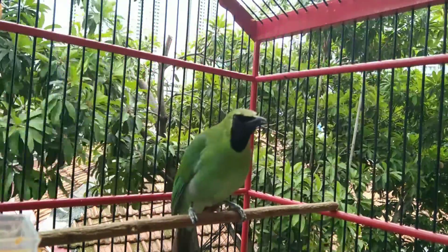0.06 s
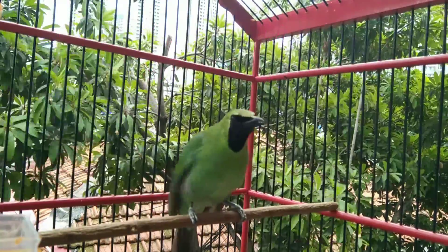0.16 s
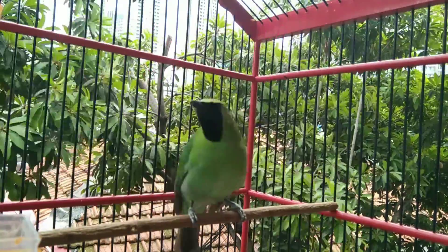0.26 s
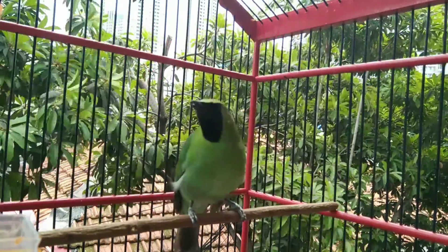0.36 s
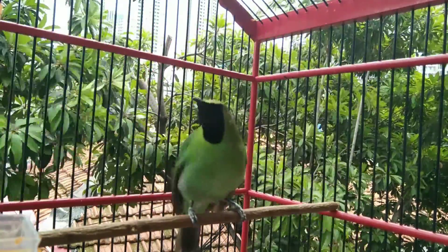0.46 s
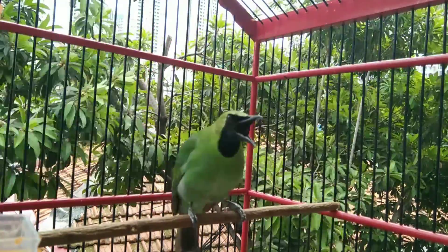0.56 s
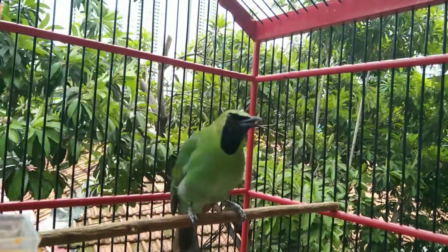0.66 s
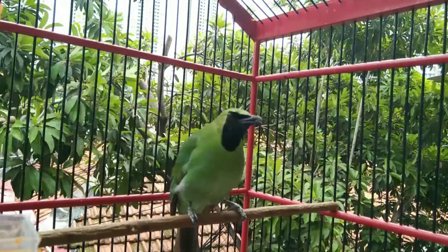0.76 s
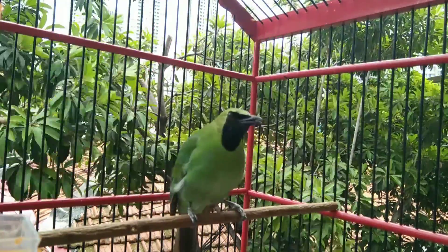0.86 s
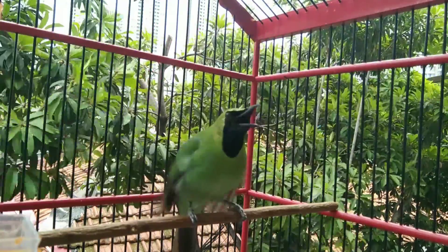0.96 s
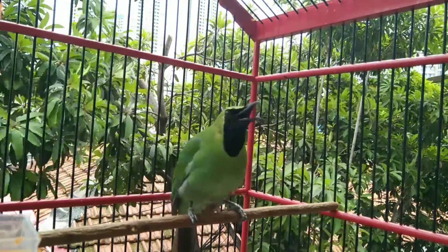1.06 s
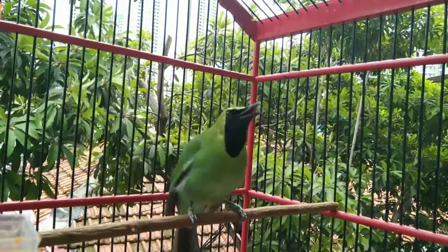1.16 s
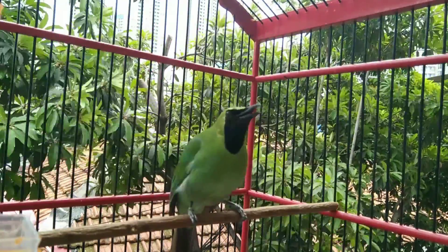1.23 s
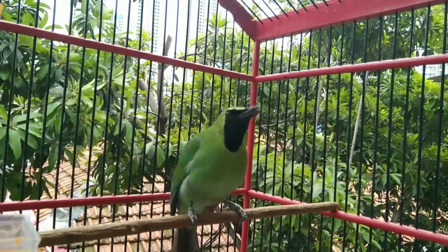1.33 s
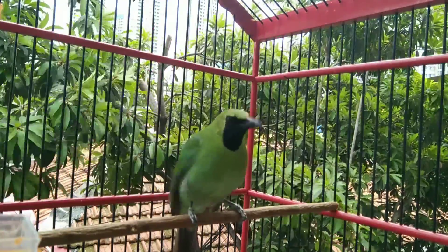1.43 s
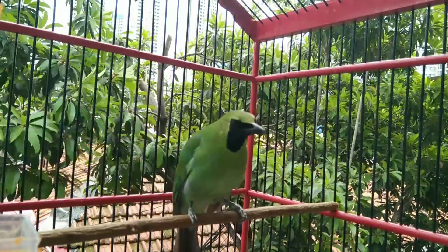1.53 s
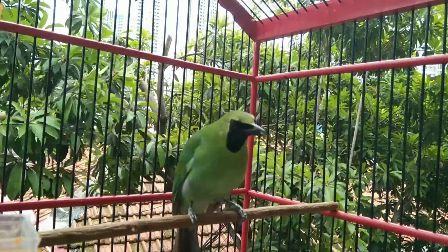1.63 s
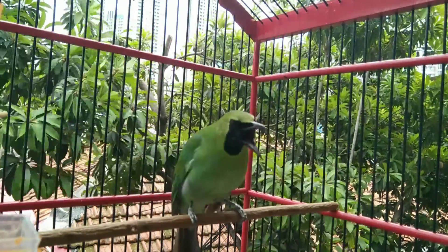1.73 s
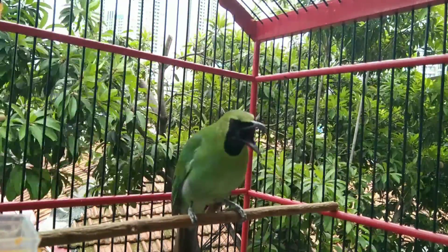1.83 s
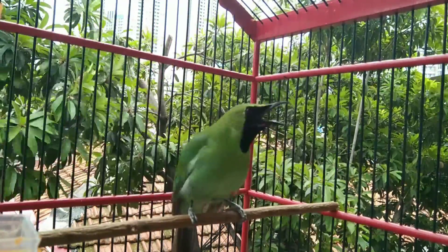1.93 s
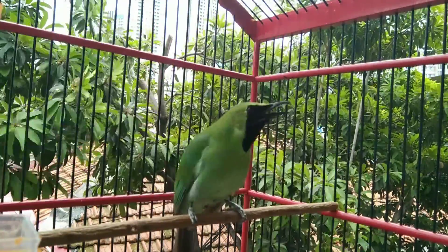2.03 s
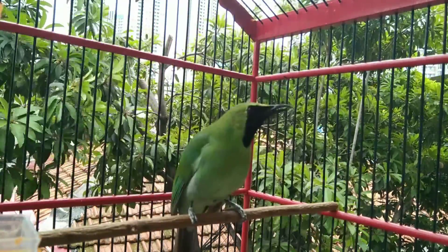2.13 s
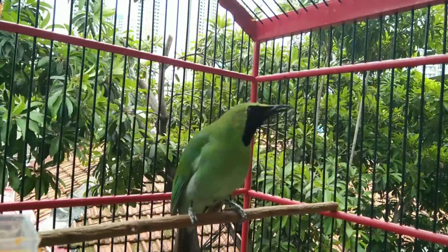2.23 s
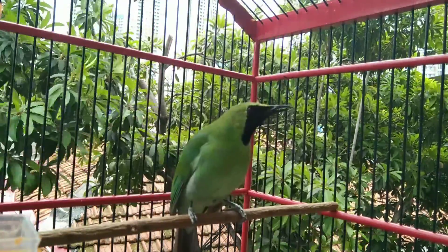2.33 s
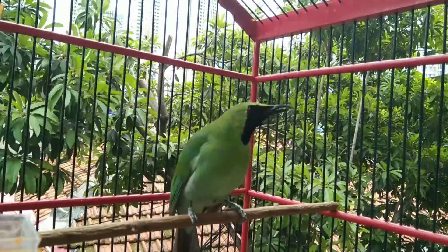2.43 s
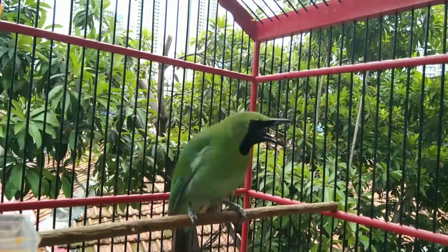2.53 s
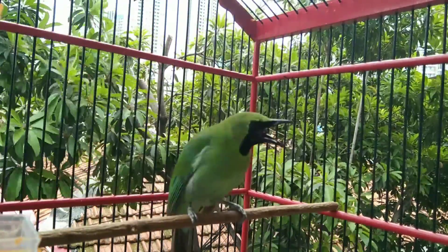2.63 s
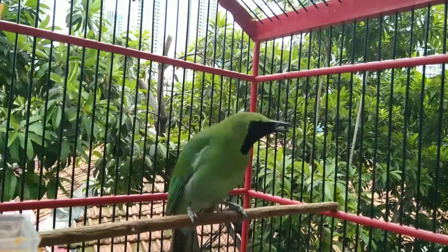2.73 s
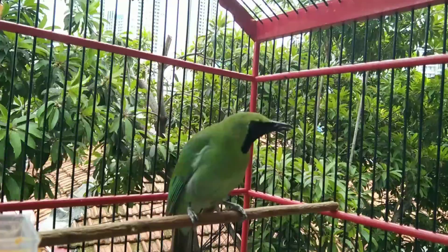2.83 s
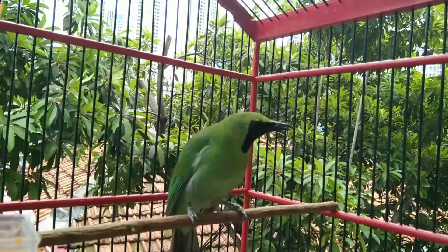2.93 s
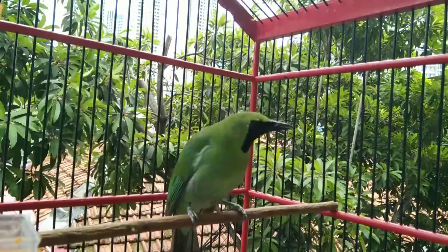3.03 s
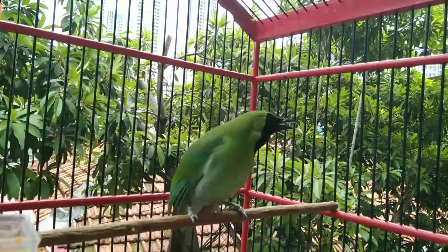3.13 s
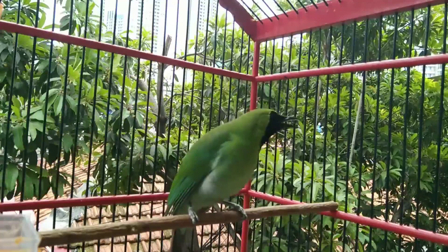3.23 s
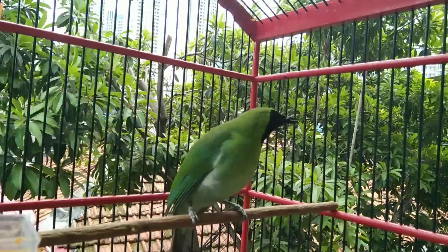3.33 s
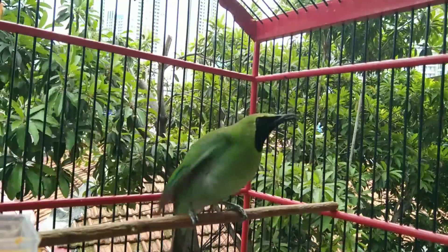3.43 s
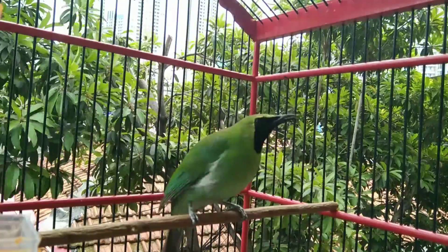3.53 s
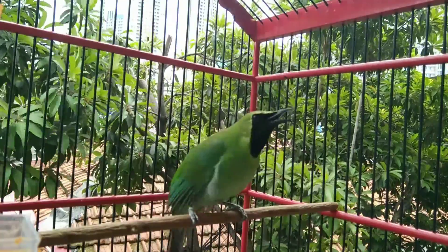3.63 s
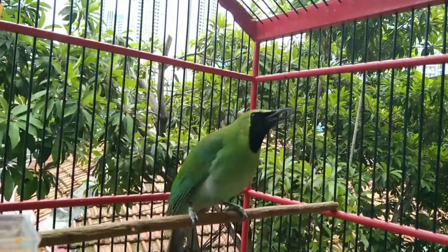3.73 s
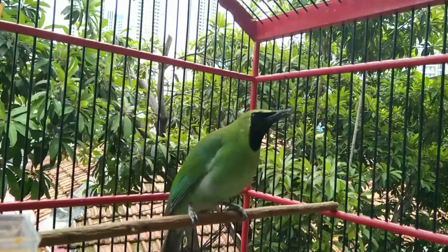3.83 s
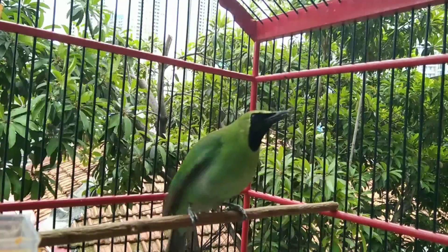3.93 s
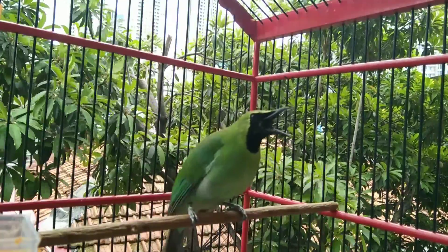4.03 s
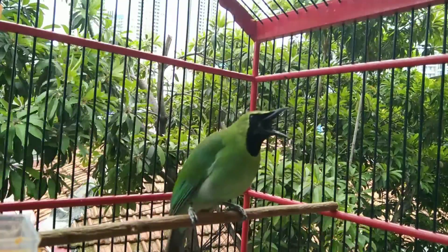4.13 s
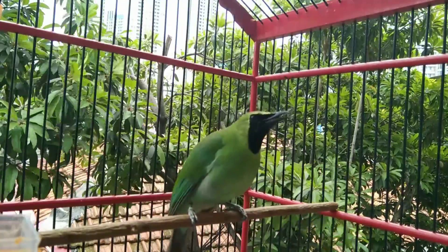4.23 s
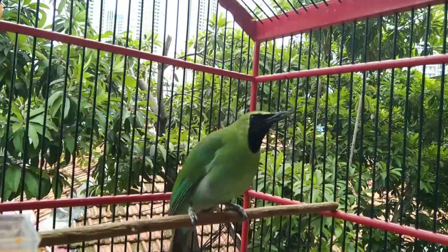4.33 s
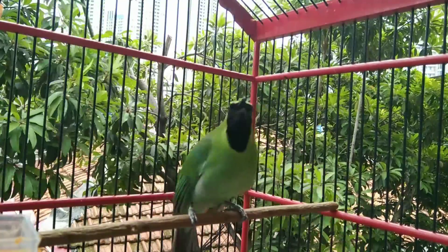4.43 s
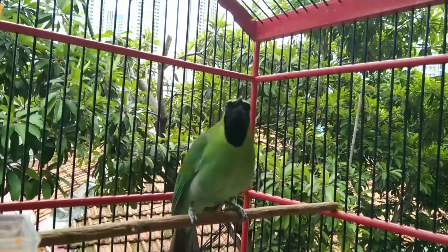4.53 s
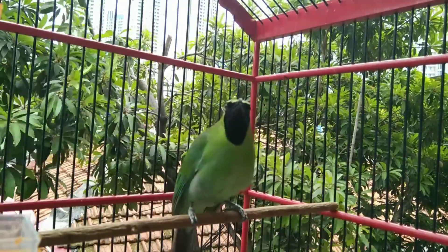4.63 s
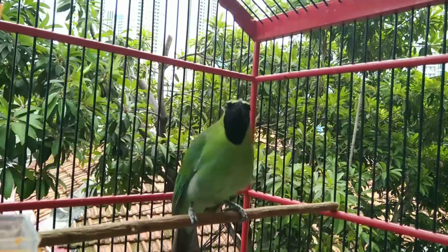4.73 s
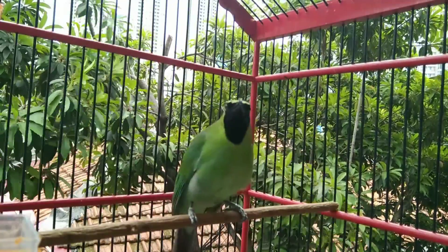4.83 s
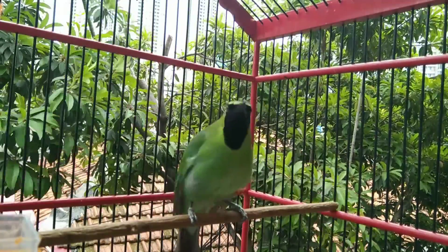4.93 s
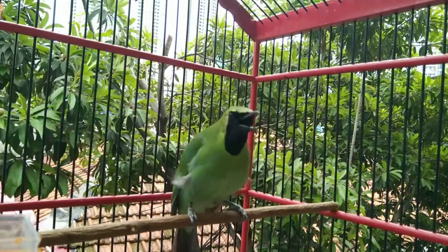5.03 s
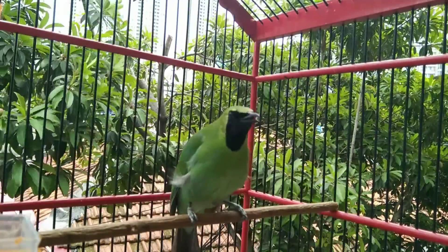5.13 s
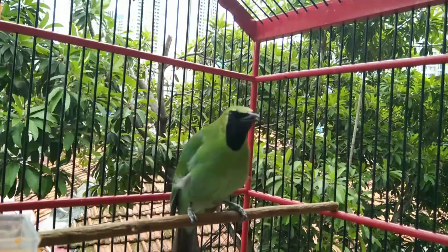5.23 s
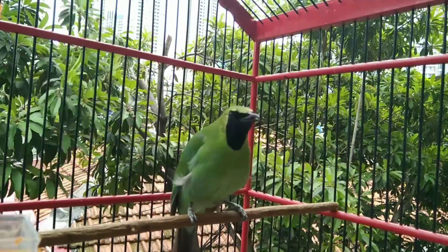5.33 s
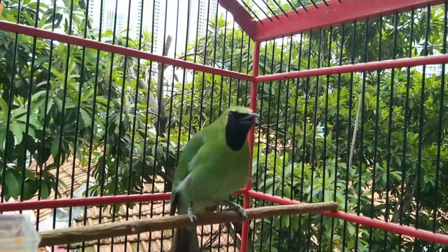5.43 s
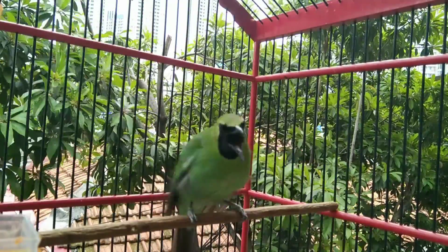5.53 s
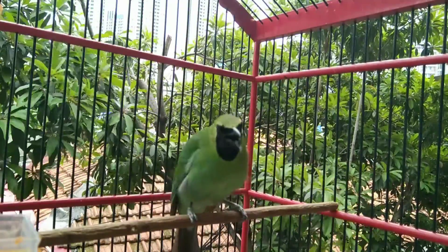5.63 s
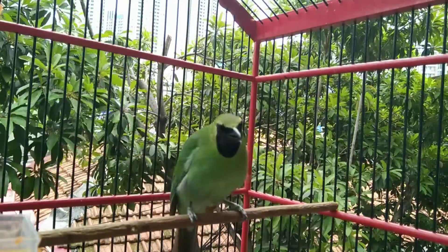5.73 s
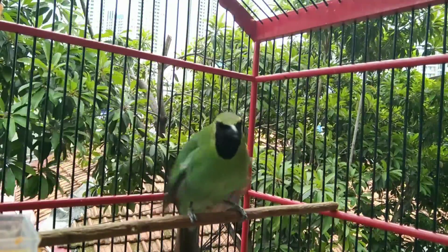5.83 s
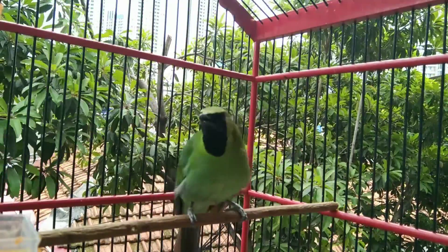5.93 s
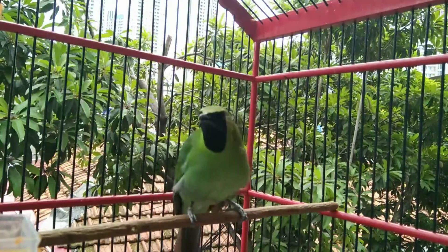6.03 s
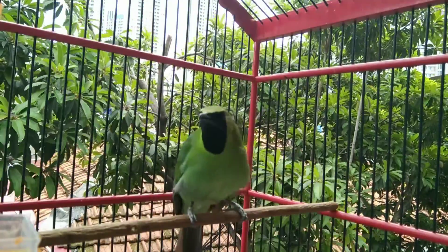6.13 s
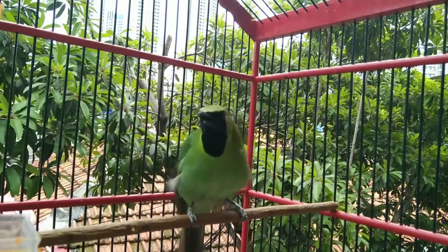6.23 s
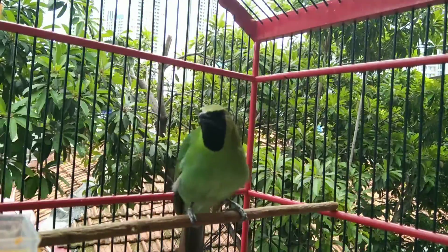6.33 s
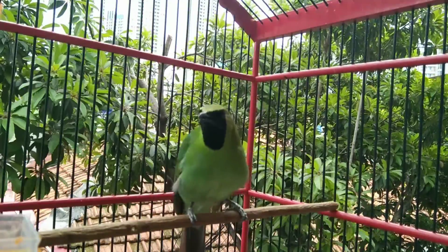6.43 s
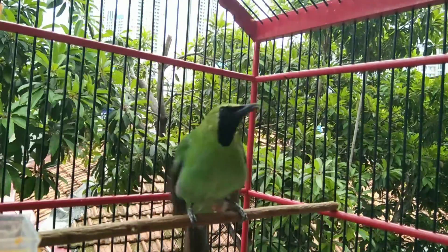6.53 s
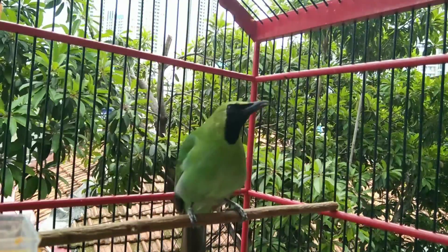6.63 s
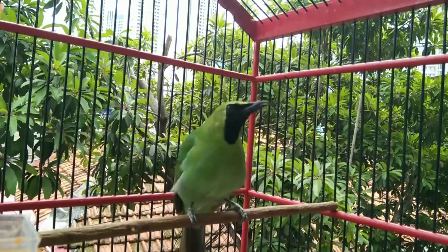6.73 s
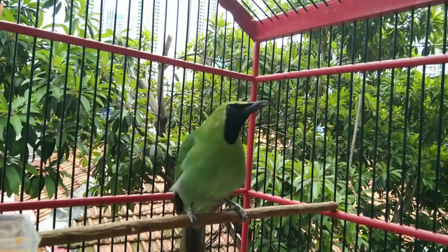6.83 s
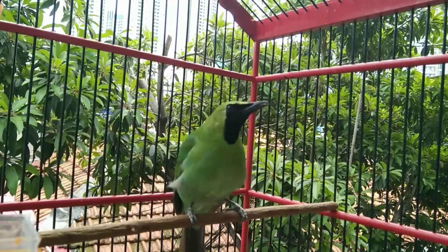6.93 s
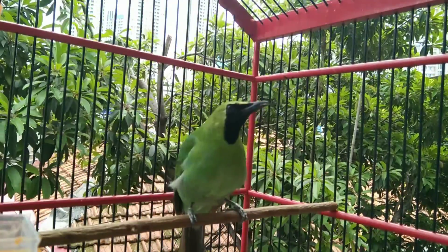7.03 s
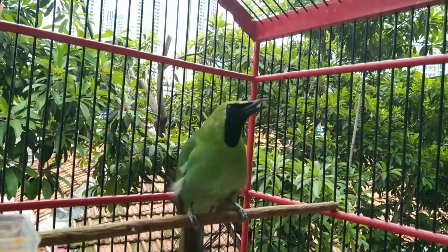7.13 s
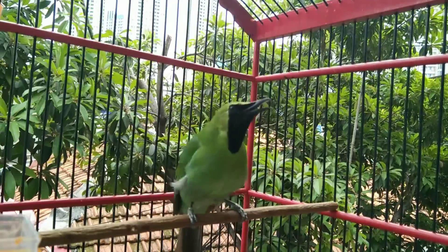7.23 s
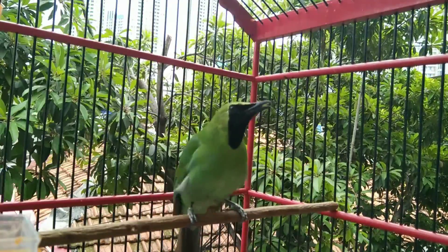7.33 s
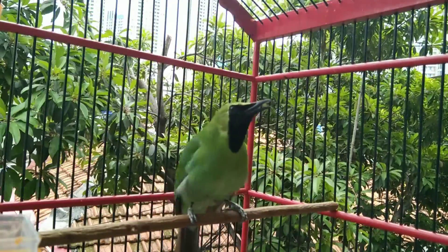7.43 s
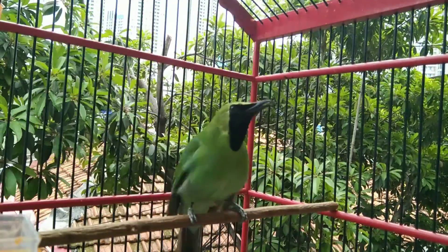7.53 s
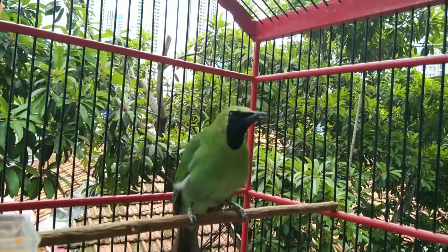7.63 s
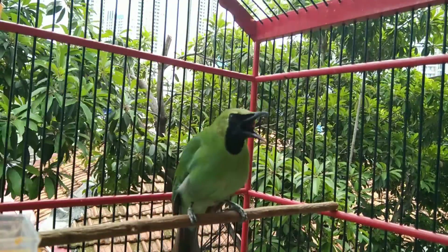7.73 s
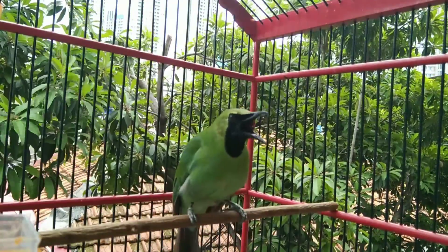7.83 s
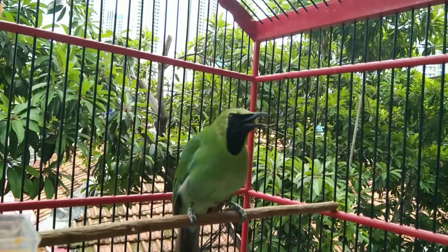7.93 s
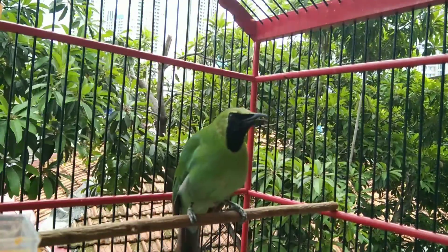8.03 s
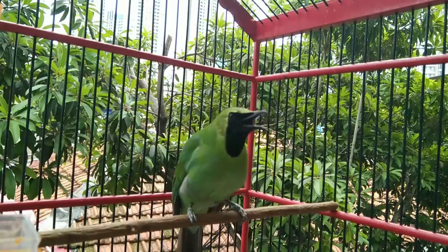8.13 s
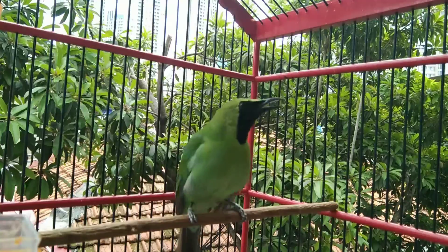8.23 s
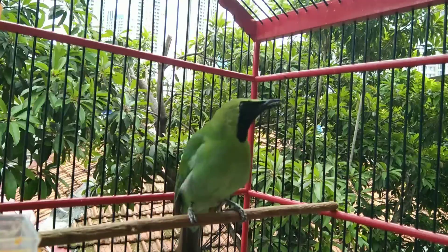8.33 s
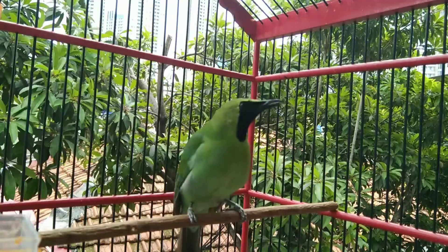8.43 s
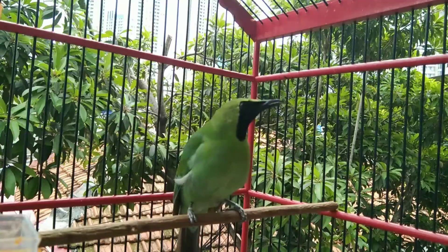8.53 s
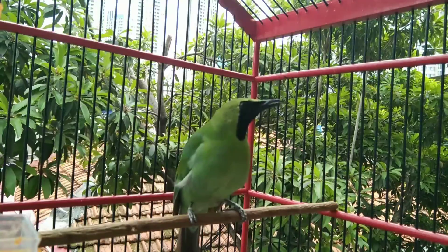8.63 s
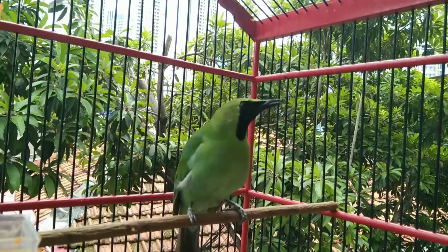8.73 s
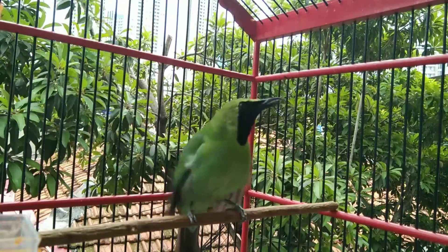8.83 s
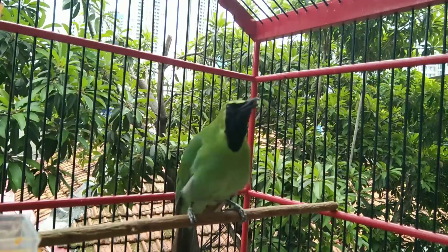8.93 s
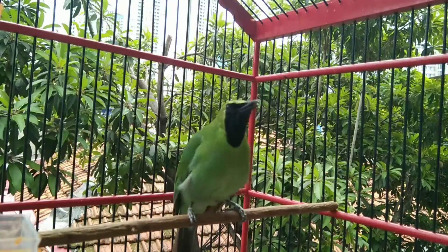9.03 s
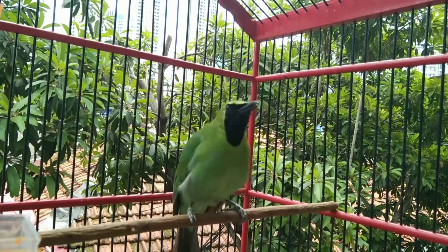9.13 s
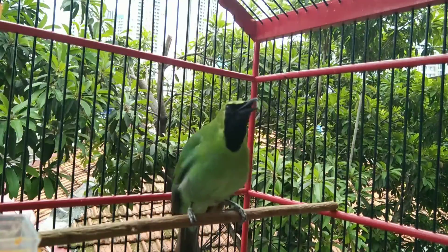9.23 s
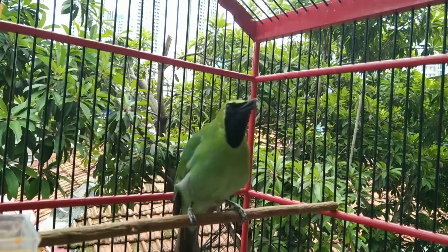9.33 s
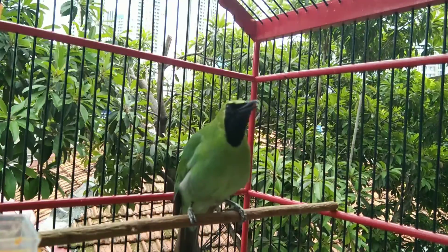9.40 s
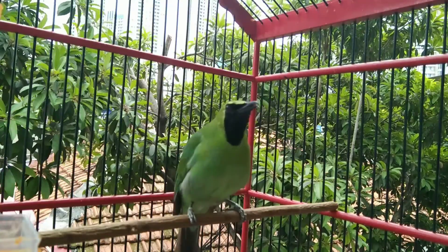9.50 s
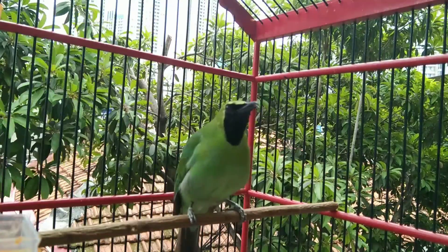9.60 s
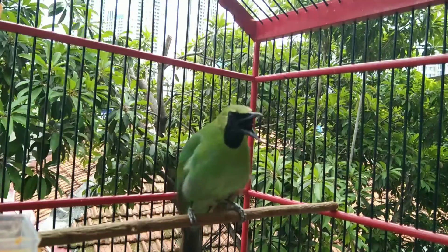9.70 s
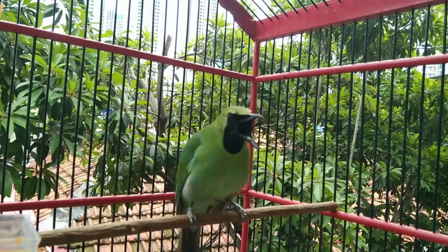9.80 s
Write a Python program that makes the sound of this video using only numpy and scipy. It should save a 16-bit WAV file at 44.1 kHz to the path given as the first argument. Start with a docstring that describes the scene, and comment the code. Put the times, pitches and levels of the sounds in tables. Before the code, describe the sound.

Outdoors on a porch beside a garden, one bird whistles brightly at close range, starting half a second in and continuing to the end with short gaps. Clean glides alternate with slightly raspy rises, then rounded up-and-down notes. The loud notes are gently levelled by a limiter. Soft bassy wind buffets the microphone, leaves rustle faintly, and a distant bird pipes weakly.

```python
"""Wind thuds on the microphone port, leaves hiss and the garden hums, as a porch still rings from a whistle.
From half a second in, a caged songbird close by clicks its beak and whistles short, nearly pure glides;
both halves of its syrinx take turns, hoarse where the membranes beat unevenly, and walls and roof answer.
Near three seconds a far bird adds thin whistles; then come dipping rises, each handed to the other voice.
Arches and falls carry on to the end; a limiter turns the level down on the loud notes throughout."""
import sys
import numpy as np
from scipy import signal
from scipy.fft import rfft, irfft, next_fast_len
from scipy.io import wavfile
from scipy.ndimage import uniform_filter1d, map_coordinates

SR = 44100
rng = np.random.default_rng(int(sys.argv[2]) if len(sys.argv) > 2 else 0)


def master_out(mix):
    """Clip the mix to full scale and print it as 16-bit PCM to the path in sys.argv[1]."""
    frames = np.transpose(np.atleast_2d(mix))
    ceiling = np.clip(frames, -1, 1)
    pcm = np.round(ceiling * 32767).astype(np.int16)
    wavfile.write(sys.argv[1], SR, pcm)


N = 434826
LEAD = 11025  # samples sung before time zero, whose echo still rings
TRACK = N + LEAD + SR  # samples in a bird's track
TOP_HZ = 15800  # nothing sounds above this


def amp(db):
    """Gain of a level in dB."""
    return 10 ** (np.asarray(db) / 20)


def unit(x):
    """x at rms 1."""
    return x / np.sqrt(np.mean(x ** 2) + 1e-20)


def along(points, hz):
    """Reads (frequency, value) points at hz, on a log frequency axis."""
    f, v = np.transpose(points)
    return np.interp(np.log(hz + 1), np.log(f + 1), v)


def wobble(rate, size):
    """A smooth random curve, rate knots a second."""
    knots = rng.standard_normal(int(size * rate / SR) + 4)
    return map_coordinates(knots, [np.arange(size) * rate / SR])


def filtered(x, gain_at):
    """x with each frequency scaled by gain_at(hz), padded so that the ends do not wrap."""
    m = next_fast_len(len(x) + 8192)
    return irfft(rfft(x, m) * gain_at(np.fft.rfftfreq(m, 1 / SR)), m)[:len(x)]


def coloured(x, points):
    """x shaped by a (frequency [Hz], gain [dB]) curve."""
    return filtered(x, lambda hz: amp(along(points, hz)))


def noise(points, size):
    """Coloured noise of rms 1."""
    return unit(coloured(rng.standard_normal(size), points))


def add(track, s, piece, rise=.004, fall=.008):
    """Lays a piece with soft ends (rise and fall in s) on a track that starts LEAD samples early."""
    t = np.arange(len(piece)) / SR
    ends = np.sin(np.pi / 2 * np.clip(np.minimum(t / rise, t[::-1] / fall), 0, 1)) ** 2
    at = track[round(s * SR) + LEAD:][:len(piece)]
    at += (piece * ends)[:len(at)]


# wind buffeting: (time [s], level [dB])
WIND = [(0, -32), (0.16, -50), (0.26, -25), (0.37, -38), (0.47, -29), (0.7, -46), (1.1, -38), (1.48, -35),
        (2.0, -47), (2.64, -45), (2.77, -23), (2.83, -37), (2.97, -27), (3.25, -33), (3.6, -38),
        (4.31, -51), (4.95, -42), (5.07, -52), (5.22, -31), (5.5, -47), (6.04, -45), (8.2, -49), (8.9, -42),
        (9.16, -30), (9.31, -50), (9.72, -39), (9.86, -55)]
# its bassy colour: (frequency [Hz], relative density [dB per Hz])
BUFFET = [(25, -21.5), (90, 1), (170, -5), (260, -16.5), (600, -35.5), (1000, -72)]


def wind():
    """Low turbulent noise thuds on the microphone port in random lumps."""
    lumps = amp(4.0 * wobble(22, size=N))
    buffet = unit(lumps * noise(BUFFET, size=N))
    return amp(np.interp(np.arange(N) / SR, *np.transpose(WIND))) * buffet


# gusts in the trees: (peak time [s], half length [s], level before flicker [dB])
LEAVES = [(0.025, 0.18, -63), (0.404, 0.15, -52), (5.509, 0.058, -48.5), (6.79, 0.053, -47.5),
          (7, 0.024, -51), (8.575, 0.033, -51.5), (9.74, 0.091, -55)]
# leaf hiss: (frequency [Hz], relative density [dB per Hz])
RUSTLE = [(1500, -38), (3000, -3.5), (5000, 0), (8000, 6.5), (10000, -6), (15000, -28)]


def leaves():
    """Each gust swells and fades as a bell curve of hiss, as many small leaves brush."""
    t = np.arange(N) / SR
    gusts = sum(amp(db) * np.exp(-((t - s) / half) ** 2) for s, half, db in LEAVES)
    flicker = amp(0.97 * wobble(27, size=N))
    return gusts * flicker * noise(RUSTLE, size=N)


# the garden's hum: (frequency [Hz], relative density [dB per Hz])
GARDEN = [(30, -22.5), (86, -3.5), (164, -9.5), (311, -12.5), (2260, -28.5), (3150, -32), (4520, -30.5),
          (5500, -35.5), (8200, -30.5), (9500, -51.5), (12000, -56), (16000, -72.5)]


def garden():
    """Steady coloured noise whose level drifts slowly."""
    return amp(-45 + 1.7 * wobble(3.33, size=N)) * noise(GARDEN, size=N)


# arched whistles: (start [s], top [s], end [s], first pitch [Hz], top pitch [Hz], last pitch [Hz],
# first level [dB], first octave [dB re level], level [dB], brightness [dB], rasp drive of the end [dB])
ARCHES = [(-0.13, -.07, -.02, 1827, 2500, 2204, -30, -20, -12, -3, -45),
          (7.21, 7.29, 7.363, 905, 2180, 1660, -46, 27, -5, 0, -25),
          (7.472, 7.533, 7.603, 1226, 2245, 1580, -37.5, 19, -4, -1, -25),
          (8.18, 8.205, 8.279, 2380, 2765, 2320, -26, -5, -3, -3, -42),
          (9.258, 9.318, 9.383, 1680, 2175, 1480, -32, -22, -7, 3, -21)]
# climb: (share of its time, share of its pitch range, level [dB re note], octave [dB re level],
# drive of the higher overtones [dB])
ARCH_UP = [(.18, .5, -23, -18, -40), (.5, .8, -5, -36, -38), (1, 1, -1, -40, -30)]
# drop: (share of its time, level [dB re note], octave [dB re level], drive of the higher overtones [dB])
ARCH_DOWN = [(.35, 0, -36, -26), (.7, -2, -24, -18), (1, -9, -20, -26)]


def arches():
    """Pitch climbs, then drops with time squared; the end turns hoarse."""
    first_upper_db = -17  # higher overtones under the octave as an arch opens
    flutter = .6  # added pitch flutter [%] of the hoarse end
    notes, hoarse = [], []
    for s, peak, end, first, top, last, first_db, octave_db, db, bright_db, rasp_db in ARCHES:
        up = [(s + u * (peak - s), first + v * (top - first), max(db + level, first_db), *tone)
              for u, v, level, *tone in ARCH_UP]
        down = [(peak + u * (end - peak), top + u * u * (last - top), db + level, *tone)
                for u, level, *tone in ARCH_DOWN]
        opening = (s, first, first_db, octave_db, octave_db + first_upper_db)
        notes.append([opening, *(np.array(up + down) + [0, 0, 0, bright_db, bright_db])])
        hoarse.append((peak + .03, end + .016, rasp_db, flutter))
    return notes, hoarse


# how long the porch rings: (frequency [Hz], time to fall 60 dB [s])
PORCH_T60 = [(1000, 0.25), (2500, 0.39), (5000, 0.31), (10000, 0.28), (16000, 0.11)]
# strength of its answer: (frequency [Hz], gain [dB])
PORCH_COLOUR = [(1500, -2), (2300, -2), (2900, 0.5), (3600, -2), (10000, 1)]


def porch(x):
    """The answer builds up as the far walls join in; each frequency dies at its own speed."""
    build = 0.008  # s
    hz, t, z = signal.stft(rng.standard_normal(SR), SR, nperseg=256)
    decay = amp(-60 * t / along(PORCH_T60, hz)[:, None])
    shape = (1 - np.exp(-(t / build) ** 2)) * decay
    tail = signal.istft(z * shape, SR, nperseg=256)[1]
    return signal.fftconvolve(coloured(x, PORCH_COLOUR), tail / np.linalg.norm(tail))[:len(x)]


# the beak ticks open: (time [s], drive before colouring [dB])
TICKS = [(0.5328, -20.5), (1.0049, -18), (1.7642, -12.5), (2.571, -9), (2.8843, -25), (3.1575, -15),
         (3.6445, -14), (4.0492, -14), (4.4273, -24), (4.9675, -20), (5.8644, -24), (7.201, -19),
         (7.2075, -13), (7.4641, -14.5), (8.166, -22), (8.8822, -16), (9.248, -15), (9.7514, -15)]
# (frequency [Hz], gain [dB])
TICK_COLOUR = [(300, -20), (1200, -7), (2500, -5), (4200, -15), (7000, -30), (15000, -42)]


def beak_ticks():
    """Each opening of the beak is a noise burst that falls 60 dB in 30 ms, cut short by a soft end."""
    taps, t = np.zeros(TRACK), np.arange(1200) / SR
    for s, db in TICKS:
        add(taps, s, amp(db - 60 * t / .03) * rng.standard_normal(len(t)), rise=.0006)
    return coloured(taps, TICK_COLOUR)


# high falling whistles: (start [s], length [s], first pitch [Hz], last pitch [Hz], bend of the fall,
# first level [dB], level [dB], brightness [dB])
FALLS = [(0.553, .182, 5330, 4450, 1.45, -18, -5, -1), (4.071, .16, 5780, 4600, 2.9, -16, -2, 0),
         (5.533, .17, 5600, 4450, 1.45, -30, -4, 0), (9.768, .19, 5530, 4500, 1.3, -20, -3, 4)]
# their course: (share of length, level [dB re note], octave [dB re level], drive of the higher overtones [dB])
FALL_SHAPE = [(0, 0, -12, -40), (.13, 0, -25, -38), (.3, -1, -23, -31), (.55, 0, -22, -32),
              (.78, -2, -21, -35), (1, -5, -24, -37)]


def falls():
    """Pitch drops along a power curve, quick at first and then settling."""
    u, level, octave, upper = np.transpose(FALL_SHAPE)
    notes = []
    for s, length, first, last, bend, first_db, db, bright_db in FALLS:
        hz = last + (first - last) * abs(1 - u) ** bend
        note_db = np.where(u > 0, db + level, first_db)
        notes.append(np.c_[s + u * length, hz, note_db, octave + bright_db, upper + bright_db])
    return notes


# calls sung once, one list for each voice: (time [s], pitch [Hz], level [dB], octave [dB re level],
# drive of the higher overtones [dB])
CALLS_ONCE = [
    [(1.008, 2124, -54.5, 10.5, -8.5), (1.02, 2900, -24, -11, -20.5), (1.045, 3230, -13.5, -11.5, -31.5),
     (1.07, 2970, -10.5, -30, -39.5), (1.13, 2773, -8.5, -23, -31), (1.2, 2426, -9, -39.5, -26.5),
     (1.25, 2300, -9, -36, -31), (1.303, 2330, -9.5, -35.5, -27)],
    [(1.047, 3576, -20.5, -1, -23), (1.07, 3347, -7.5, -27, -30), (1.103, 3150, -35, -11.5, -30.5)],
    [(1.772, 1240, -40.5, 10, 6), (1.785, 1943, -28, 8, 7.5), (1.81, 2366, -25, 18, 0),
     (1.835, 2614, -18.5, 3.5, -7.5), (1.87, 2739, -13.5, -4, -14.5), (1.93, 2635, -16, -4.5, -7),
     (2.0, 2701, -10, -16, -35), (2.06, 2554, -6.5, -26, -45), (2.085, 2370, -3, -35, -36),
     (2.158, 2293, -10, -32, -25)],
    [(1.825, 4860, -20.5, -16.5, -25), (1.845, 4676, -11.5, -22, -31), (1.88, 4900, -14, -29, -41),
     (1.938, 4750, -16, -22.5, -29.5)],
    [(2.575, 1320, -33, 7, -2.5), (2.59, 3240, -22, -2, -36), (2.61, 4020, -11, -5.5, -25.5),
     (2.635, 4800, -9, -20.5, -33.5), (2.69, 5160, -8, -12.5, -27), (2.78, 4907, -10.5, -14, -38.5),
     (2.797, 4655, -6, -23, -49), (2.809, 3490, -25, -22, -29.5)],
    [(2.578, 751, -46, -20, 14), (2.59, 1600, -32, -30, 1.5), (2.61, 2093, -23, -29, -12.5),
     (2.68, 2400, -33, -28, -11.5), (2.73, 2445, -64, -26, -3)],
    [(3.275, 3440, -15, -31, -30), (3.286, 3306, -45.5, -30, -34)],
    [(4.55, 3580, -21.5, -26.5, -27), (4.563, 3380, -32, -39.5, -32)],
    [(7.787, 2444, -33.5, -23.5, -8.5), (7.797, 3830, -25, -6.5, -42.5), (7.82, 4680, -1, -26, -49),
     (7.84, 4850, -6.5, -17.5, -21), (7.865, 4500, -5.5, -17.5, -21), (7.895, 3880, -8, -6.5, -33.5),
     (7.94, 3677, -6.5, -22, -39), (7.99, 3246, -9, -19.5, -45)],
    [(8.885, 963, -45, 18, -2), (8.9, 1590, -26.5, -15, -43), (8.92, 1692, -20, -23, -37.5),
     (8.937, 2075, -6.5, -32, -36.5), (8.952, 1940, 1.5, -31.5, -29), (8.963, 2020, -3.5, -27, -21),
     (9.01, 1866, -7.5, -29, -16), (9.053, 1532, -16.5, -25, -40.5)],
]


def single_calls():
    """Freely drawn glides, some of them two voices at once."""
    return list(CALLS_ONCE)


# stretches where the membranes beat unevenly: (start [s], end [s], rasp drive [dB], added pitch flutter [%])
RASP = [(1.01, 1.064, -20.5, 1.), (1.784, 1.941, -17, 0.37), (2.06, 2.095, -33, .8),
        (2.57, 2.69, -23, 0.42), (8.897, 8.932, -30, 0.9), (9.024, 9.073, -22, 0.77)]


def hoarseness(stretches):
    """Rasp gain and pitch flutter over time, as uneven membranes come and go."""
    rasp, flutter = np.zeros((2, TRACK))
    for start, end, db, percent in stretches:
        stretch = np.ones(round((end - start) * SR))
        add(rasp, start, amp(db) * stretch, rise=0.02, fall=0.01)
        add(flutter, start, percent / 100 * stretch, rise=0.0053, fall=.015)
    return rasp, flutter + 0.0039  # a little flutter is always there


# the far bird: (start [s], length [s], first, middle and last pitch [Hz], peak level before wobble [dB])
FAR = [(2.915, .05, 2850, 2540, 2830, -60), (2.99, .098, 3230, 3280, 3100, -57),
       (3.1, .05, 3750, 3750, 3300, -62), (5.17, .24, 3850, 3970, 4165, -65),
       (6.45, .07, 4770, 4650, 4570, -69), (6.56, .12, 4650, 4600, 4560, -70)]


def far_bird():
    """Thin pure whistles from across the garden, their level wavering."""
    out = np.zeros(TRACK)
    for s, length, first, middle, last, db in FAR:
        path = [(s, first), (s + length / 2, middle), (s + length, last)]
        phase, hz = glide(path, np.full(SR, .004))
        add(out, s, amp(db + 5.2 * wobble(42, size=len(hz))) * np.sin(phase))
    return out


# dipping rises: (start [s], dip [s], break [s], dip, kick, sag, mid-climb and top pitch [Hz],
# kick level [dB], level [dB], brightness [dB], rasp drive [dB])
RISES = [(3.165, 3.192, 3.252, 1630, 1960, 2020, 2370, 2400, -16, -4, -6, -38),
         (3.652, 3.67, 3.738, 1650, 1880, 1780, 2280, 2600, -19, -5, -2, -30),
         (4.436, 4.455, 4.525, 1620, 1780, 1620, 2210, 2360, -23, -6, -1, -28),
         (4.971, 4.999, 5.059, 1630, 1820, 1770, 2240, 2600, -18, -3, 2, -27),
         (5.871, 5.895, 5.968, 1650, 1720, 1760, 2200, 2310, -25, -7, 2, -27),
         (6.196, 6.22, 6.283, 1410, 1450, 1620, 2240, 2310, -20, -3, -2, -29)]
# start, dip, kick, sag, then three climb points:
# (level [dB re kick, then re note], octave [dB re level], drive of the higher overtones [dB])
RISE_TONE = [(-14, -24, -36), (-4, -14, -24), (0, -21, -24), (-1, -22, -22), (-6, -33, -27), (0, -36, -27),
             (-4, -14, -15)]
# (share of climb time and share of the way to mid-climb pitch at its first point, share of time at mid-climb)
CLIMB = (.22, .55, .55)


def rises():
    """Pitch dips, kicks and sags, then climbs until the voice breaks; hoarse from the dip on."""
    from_hz, kick_s, sag_s = 1910, .007, .014  # opening pitch; kick and sag after the dip
    dip_flutter, climb_flutter = 1.8, .6  # added pitch flutter [%]
    early, share, middle = CLIMB
    notes, hoarse = [], []
    for s, dip, end, low, kick, sag, mid, top, kick_db, db, bright_db, rasp_db in RISES:
        foot = dip + sag_s
        path = [(s, from_hz, kick_db), (dip, low, kick_db), (dip + kick_s, kick, kick_db), (foot, sag, kick_db)]
        climb = [(early, sag + share * (mid - sag)), (middle, mid), (1, top)]
        path += [(foot + u * (end - foot), hz, db) for u, hz in climb]
        notes.append([(t, hz, base + level, *np.add(tone, bright_db))
                      for (t, hz, base), (level, *tone) in zip(path, RISE_TONE)])
        hoarse += [(dip - .012, foot + .012, rasp_db, dip_flutter), (foot, end + .005, rasp_db, climb_flutter)]
    return notes, hoarse


# held notes: (start [s], length [s], first pitch [Hz], last pitch [Hz], level [dB], last level [dB],
# brightness [dB])
HOLDS = [(3.245, .085, 2850, 2830, -5, -15, -6), (3.733, .05, 2910, 2890, -8, -11, -1),
         (4.52, .065, 2810, 2770, -7, -17, -2), (5.055, .09, 2885, 2850, -5, -16, 1),
         (5.967, .046, 2740, 2290, -9, -13, 1), (6.282, .051, 2760, 2160, -5, -10, -1)]
# entry to end: (octave [dB re level], drive of the higher overtones [dB])
HOLD_TONE = [(-22, -20), (-36, -25), (-33, -30), (-33, -30)]


def holds():
    """The other voice takes over near the break of a rise, enters softly and settles early in pitch."""
    entry_db, bend = -3, 2.8
    u = np.array([0, .15, .55, 1])
    notes = []
    for s, length, first, last, db, last_db, bright_db in HOLDS:
        level = db + u * (last_db - db) + entry_db * (u == 0)
        hz = last + (first - last) * abs(1 - u) ** bend
        notes.append(np.c_[s + u * length, hz, level, np.add(HOLD_TONE, bright_db)])
    return notes


def song():
    """Every note of the near bird in time order, and all hoarse stretches."""
    arch_notes, arch_hoarse = arches()
    rise_notes, rise_hoarse = rises()
    notes = arch_notes + falls() + single_calls() + rise_notes + holds()
    return sorted(notes, key=lambda rows: rows[0][0]), list(RASP) + arch_hoarse + rise_hoarse


def glide(rows, flutter):
    """Phase, pitch and the other columns of a note; muscles round the corners of its pitch with a cubic."""
    s, hz, *cols = np.transpose(rows)
    t = np.arange(s[0], s[-1], 1 / SR)
    j = np.clip(np.searchsorted(s, t, "right") - 1, 0, len(s) - 2)
    step, lean = np.diff(s)[j], np.diff(hz) / np.diff(s)
    before, after = np.r_[lean[0], lean], np.r_[lean, lean[-1]]
    total = before + after
    # flat at turning points, so no overshoot
    slope = np.where(before * after > 0, 2 * before * after / np.where(total == 0, 1, total), 0)
    u = (t - s[j]) / step
    rise = hz[j + 1] - hz[j]
    bow = (1 - u) * (slope[j] * step - rise) - u * (slope[j + 1] * step - rise)
    hz = hz[j] + u * rise + u * (1 - u) * bow
    hz = hz * (1 + flutter[:len(t)] * wobble(170, size=len(t)))
    return 2 * np.pi * np.cumsum(hz) / SR, hz, *[np.interp(t, s, c) for c in cols]


# colour of the higher overtones: (frequency [Hz], gain [dB])
THROAT = [(3000, 10), (6000, -8.5), (8500, 6.5), (11000, -4), (16000, -5)]
# hissing air in the rasp: (frequency [Hz], relative gain [dB])
RASP_COLOUR = [(1000, -26.5), (4500, 2.5), (8000, 0), (16000, -21)]


def syrinx():
    """Two voices whistle nearly pure tones with weak overtones; they mix in one windpipe."""
    notes, hoarse = song()
    rasp, flutter = hoarseness(hoarse)
    out, hiss = np.zeros(TRACK), noise(RASP_COLOUR, size=TRACK)
    for rows in notes:
        at = round(rows[0][0] * SR) + LEAD
        phase, hz, db, octave_db, upper_db = glide(rows, flutter[at:])
        span = slice(at, at + len(hz))
        octave = np.sin(2 * phase)
        stack = 0
        for k in range(3, 10):
            gain = amp(along(THROAT, k * hz) - 3.6 * (k - 3))
            stack = stack + (k * hz < TOP_HZ) * gain * np.sin(k * phase)
        tone = np.sin(phase) + amp(octave_db) * octave + amp(upper_db) * stack
        # uneven beats smear the overtones and let air hiss through
        beats = wobble(700, size=len(hz))
        tone += rasp[span] * (beats * (0.8 * octave + 1.6 * stack) + 0.6 * hiss[span])
        # the product with the voice already sounding makes sum tones and weaker difference tones
        tone += 2.1 * np.gradient(tone * out[span])
        add(out, rows[0][0], np.sqrt(2) * amp(db + 0.43 * wobble(90, size=len(hz))) * tone)
    return coloured(out, [(500, -33), (900, -2)])  # a small beak radiates no bass


def scene():
    """Both birds in the porch, over wind, leaves and garden."""
    near, far = syrinx() + beak_ticks(), far_bird()
    birds = near + far + porch(amp(-9.5) * near + amp(-1) * far)
    return (birds[LEAD:LEAD + N] + wind() + leaves() + garden())[None]


def record(dry):
    """A limiter takes most of the level over the knee and lets go slowly; then the band limit."""
    knee_db, share, release_db = -17, 0.61, 35  # dB, share of the excess removed, dB a second
    window = 130  # samples of level and gain smoothing
    x, t = dry[0], np.arange(N) / SR
    level = 10 * np.log10(np.abs(uniform_filter1d(x ** 2, size=window)) + 1e-12)
    cut_db = share * np.maximum(level - knee_db, 0)
    held_db = np.maximum.accumulate(cut_db + release_db * t) - release_db * t
    gain = amp(-uniform_filter1d(held_db, size=window))
    return filtered(x * gain, lambda hz: hz < TOP_HZ)[None]


dry = scene()
out = record(dry)
master_out(out)
```